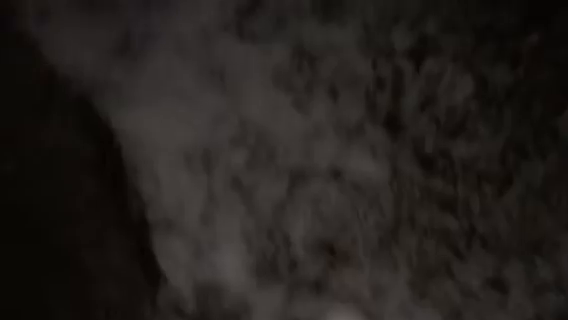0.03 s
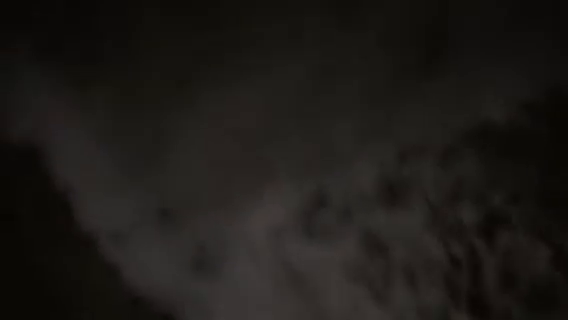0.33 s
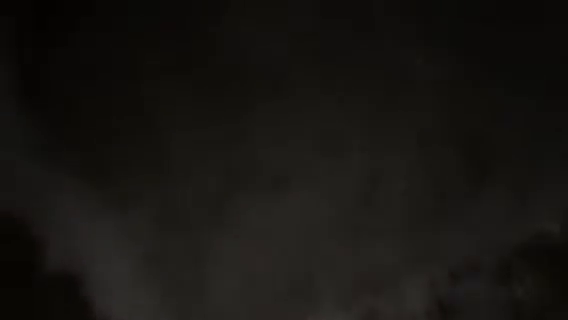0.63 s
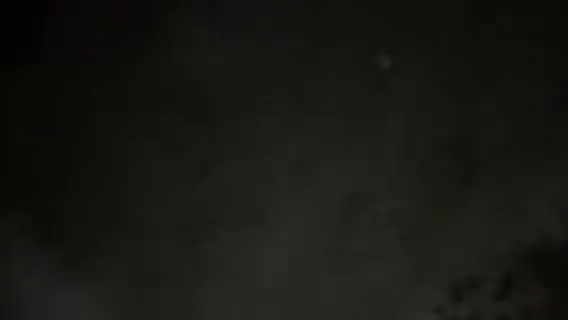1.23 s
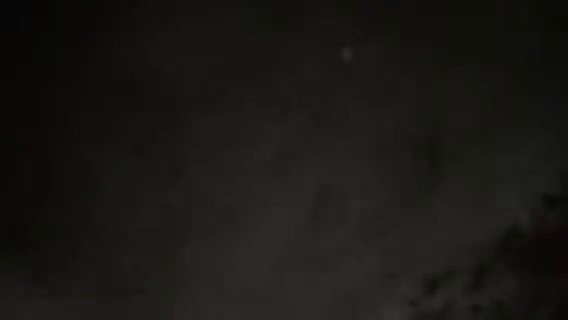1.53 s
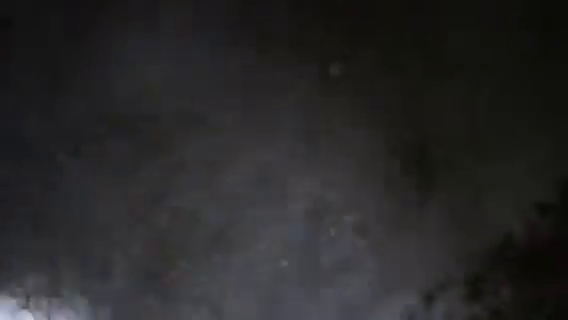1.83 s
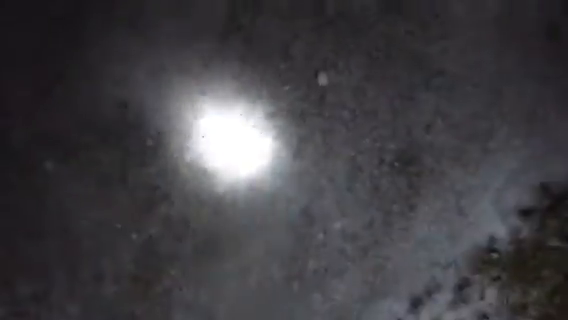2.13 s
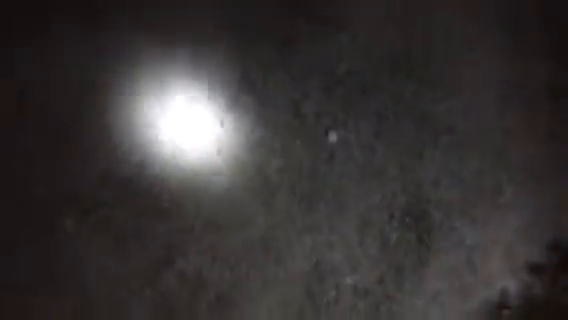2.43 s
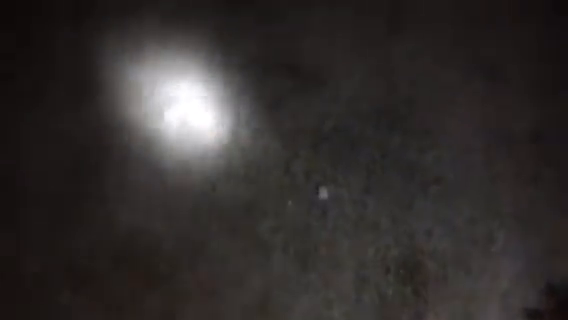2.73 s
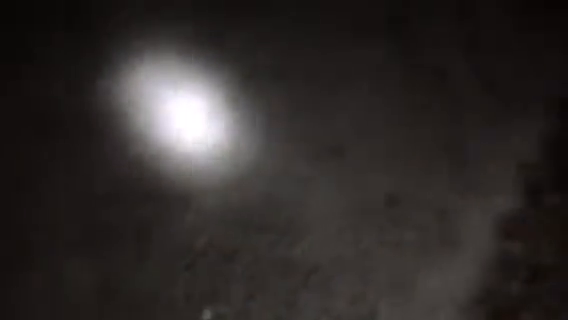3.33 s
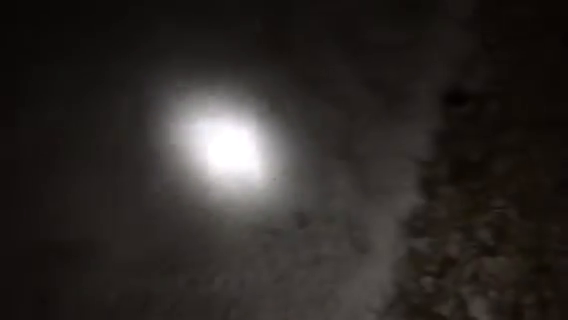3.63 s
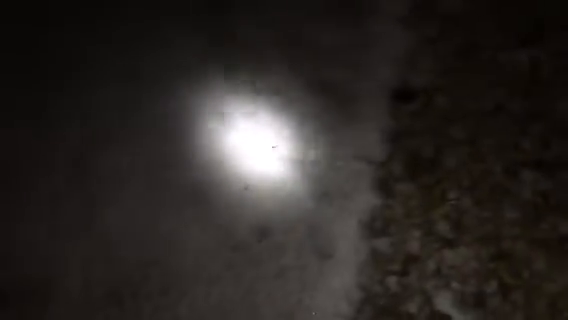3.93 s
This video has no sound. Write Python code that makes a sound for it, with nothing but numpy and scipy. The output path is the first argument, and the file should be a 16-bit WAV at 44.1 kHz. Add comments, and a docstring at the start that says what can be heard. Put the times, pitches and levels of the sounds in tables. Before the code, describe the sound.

Footsteps crunch on frozen slush outdoors at night: three slow, gritty steps with short hollow snaps of ice. The cracking then thins to isolated clicks, leaving a faint traffic-like hum and low rumble on the microphone.

```python
"""Outdoors at night, on frozen slush: three slow steps crunch, then the walker stops and the crust
keeps snapping under the shifting weight. Each step crushes a mass of small grains and sheds a fine
fizz of crystals; single plates of ice break with short hollow snaps. Behind are a distant hum like
traffic and a low rumble of air and handling on the microphone."""
import sys
import numpy as np
from scipy import signal
from scipy.fft import rfft, irfft
from scipy.io import wavfile
from scipy.ndimage import uniform_filter1d

SR = 44100
rng = np.random.default_rng(int(sys.argv[2]) if len(sys.argv) > 2 else 0)


def to_wav(s):
    """Save 16-bit WAV."""
    ch = np.atleast_2d(s).T  # columns
    pcm = np.round(np.clip(ch, -1, 1) * 32767)  # PCM
    wavfile.write(sys.argv[1], SR, pcm.astype(np.int16))


N = 176400

# Crust giving way underfoot. Each row: time in seconds, crush level in dB, fizz level in dB.
CRUST_LEVELS = [(0, -44.5, -44), (0.06, -33.5, -41), (0.125, -29.5, -38.5), (0.18, -37.5, -39),
                (0.21, -65, -41.5), (0.275, -56, -48.5), (0.335, -33, -36), (0.38, -57.5, -48.5),
                (0.48, -53, -50), (0.572, -65, -61), (0.605, -57, -51.5), (0.69, -60, -60.5),
                (0.735, -39.5, -46), (0.772, -29.5, -32), (0.83, -35, -40.5), (0.87, -42.5, -45.5),
                (0.97, -59, -54.5), (1.06, -48.5, -48.5), (1.16, -57, -53.5), (1.235, -59, -58.5),
                (1.28, -39.5, -51.5), (1.317, -42, -33.5), (1.35, -47, -47), (1.43, -51, -52.5),
                (1.55, -68, -54.5), (1.655, -51, -50), (1.73, -56, -62.5), (1.85, -51.5, -61),
                (2.04, -48, -58), (2.21, -56, -72.5), (2.32, -54, -65.5), (2.5, -64.5, -72),
                (2.8, -83, -75)]


def from_db(db):
    """Decibels to gain."""
    return 10 ** (np.asarray(db) / 20)


def rms_one(x):
    """Scale to unit power."""
    return x / np.sqrt(np.mean(x ** 2) + 1e-20)


def in_time(rows):
    """Per-sample curves from rows of time in seconds and values."""
    times_s, *columns = np.transpose(rows)
    return [np.interp(np.arange(N) / SR, times_s, column) for column in columns]


def event_time(size=1500):
    """Time axis of one small event, in seconds."""
    return np.arange(size) / SR


def pulse(t, peak_s):
    """Envelope: rises to 1 at peak_s, then decays."""
    u = np.maximum(t, 0) / peak_s
    return u * np.exp(1 - u)


def add(out, start_s, sound):
    """Mix in a short sound."""
    i = int(np.clip(start_s * SR, 0, N - 1))
    out[i:i + len(sound)] += sound[:N - i]


def colour(x, spectrum):
    """Minimum-phase filter; white noise keeps its power. Each row: frequency in Hz, relative dB."""
    size = 2 * N
    hz, db = np.transpose(spectrum)
    bin_hz = np.arange(N + 1) * SR / size
    gain = rms_one(from_db(np.interp(np.log(bin_hz + 1), np.log(hz), db)))
    cepstrum = irfft(np.log(gain))
    cepstrum[1:N] *= 2
    cepstrum[N + 1:] = 0
    return irfft(rfft(x, size) * np.exp(rfft(cepstrum)))[:N]


def noise(spectrum):
    """Steady coloured noise, unit power."""
    return rms_one(colour(rng.standard_normal(N), spectrum))


def waver(x, depth_db, width_hz, hold_s, size=1024):
    """Neighbouring frequencies swell and sink together at random."""
    spectra = signal.stft(x, nperseg=size)[2]
    field = rng.standard_normal(spectra.shape)
    for _ in range(2):
        field = uniform_filter1d(field, max(1, int(width_hz * size / SR)), axis=0)
        field = uniform_filter1d(field, max(1, int(2 * hold_s * SR / size)), axis=1)
    gain = rms_one(from_db(depth_db * rms_one(field)))
    return signal.istft(spectra * gain, nperseg=size)[1][:N]


def swells(rows, spectrum, size=1500):
    """Levelled noise under bell-shaped swells."""
    t, x = np.arange(N) / SR, noise(spectrum)
    x = x / np.sqrt(uniform_filter1d(x ** 2, size) + 1e-9)
    return x * sum(from_db(db) * np.exp(-.5 * ((t - at_s) / half_s) ** 2) for at_s, half_s, db in rows)


def grains(spectrum, per_s, spread_db, decay_s, size=1300):
    """Tiny random fractures: noise bursts of uneven strength, levelled to unit power."""
    onsets = rng.random(N) < per_s / SR
    power = onsets * from_db(spread_db * np.minimum(rng.exponential(1, N), 5)) ** 2
    envelope = np.sqrt(signal.lfilter([1], [1, -np.exp(-2 / (decay_s * SR))], power + 1e-12))
    bursts = colour(envelope * rng.standard_normal(N), spectrum)
    local_power = uniform_filter1d(uniform_filter1d(bursts ** 2, size), size // 2)
    return bursts / np.sqrt(local_power + 1e-12)


def distant_hum(level_db=-51):
    """Wavering noise, like far traffic."""
    # Each row: frequency in Hz, relative level in dB.
    spectrum = [(100, -6), (420, -25), (600, -11.5), (800, -4.5), (960, 1), (1200, -4.5), (1600, -6),
                (2100, -14.5), (2600, -23.5), (3200, -29), (4800, -41), (16000, -50)]
    return from_db(level_db) * waver(noise(spectrum), depth_db=2.5, width_hz=130, hold_s=.08)


def mic_rumble():
    """Air and handling on the microphone: a low rumble with soft bumps."""
    # Each row: time in seconds, level in dB.
    rumble_levels = [(.6, -49.5), (1.0, -50), (1.4, -44), (2.25, -45), (2.45, -51.5), (2.95, -47.5),
                     (3.12, -52), (4, -47.5)]
    # Each row: centre in seconds, half-length in seconds, level in dB.
    bumps = [(.105, 0.022, -31), (.27, 0.091, -42.5), (.452, 0.016, -36), (1.07, 0.031, -47),
             (1.7, 0.033, -42.5), (1.87, 0.042, -43.5), (2.16, 0.017, -39.5), (2.33, 0.021, -45),
             (3.93, 0.043, -40.5)]
    # Each row: frequency in Hz, relative level in dB.
    rumble_spectrum = [(15, -62), (30, -25), (55, -2), (90, 2), (150, -2.5), (225, -3.5), (310, -15),
                       (420, -27), (1500, -76)]
    bump_spectrum = [(15, -34), (42, -16), (62, 5), (80, 2.5), (110, -4), (200, -29), (1000, -65)]
    rumble = waver(noise(rumble_spectrum), depth_db=2, width_hz=140, hold_s=.04)
    return from_db(in_time(rumble_levels)[0]) * rumble + swells(bumps, bump_spectrum)


def sole():
    """The sole packs the slush with dull thuds and scuffs lightly near the end."""
    # Each row: centre in seconds, half-length in seconds, level in dB.
    thuds = [(.13, 0.1, -44.5), (.775, 0.04, -37.5), (1.078, 0.0041, -41), (1.3, 0.026, -32.5)]
    scuffs = [(3.515, 0.0077, -62), (3.575, 0.023, -61.5)]
    # Each row: frequency in Hz, relative level in dB.
    thud_spectrum = [(50, -40), (140, -3.5), (260, -5.5), (450, -1.5), (700, -14), (1500, -49)]
    scuff_spectrum = [(1000, 5.5), (4000, 5), (7000, 13), (9500, 4), (12000, -6), (16000, -6)]
    return swells(thuds, thud_spectrum) + swells(scuffs, scuff_spectrum)


def tinkles(per_s=105, low_hz=1690, high_hz=10000, above_fizz_db=6, spread_db=4, rise_cycles=0.55):
    """Loosened crystals tick at random pitches; their level follows the fizz."""
    t, out = event_time(), np.zeros(N)
    fizz_db = in_time(CRUST_LEVELS)[1]
    candidates = 2000
    for when, chance, pitch, strength in rng.random((candidates, 4)):
        if chance < per_s * N / SR / candidates:
            hz = low_hz * (high_hz / low_hz) ** pitch
            db = fizz_db[int(when * N)] + above_fizz_db + spread_db * min(-np.log(strength), 3.5)
            tick = pulse(t, rise_cycles / hz) * np.sin(2 * np.pi * hz * t)
            add(out, when * N / SR, from_db(db) * tick)
    return out


def chips(roughness=1.34):
    """Small pieces split off with a rough, briefly ringing click."""
    # Each row: start in seconds, pitch in Hz, ring time in seconds, level in dB.
    clicks = [(.0372, 5730, 0.00062, -24.5), (1.7816, 5240, 0.00044, -32), (1.8978, 14100, 0.00016, -39),
              (2.0395, 13200, 0.00014, -35), (2.085, 3350, 0.0014, -46), (2.117, 3420, 0.0016, -49.5),
              (2.331, 6300, 0.0012, -49), (2.499, 3420, 0.0002, -45)]
    t, out = event_time(), np.zeros(N)
    for start_s, hz, ring_s, db in clicks:
        jitter = signal.lfilter([1], [1, -np.exp(-4 / (ring_s * SR))], rng.standard_normal(len(t)))
        envelope = pulse(t, ring_s) * (1 + roughness * rms_one(jitter))
        add(out, start_s, from_db(db) * envelope * np.sin(2 * np.pi * hz * t))
    return out


def crunch(crush_trim_db=0.5, fizz_trim_db=4):
    """Coarse grains crush under the sole; fine crystals fizz around it."""
    # Each row: frequency in Hz, relative level in dB.
    crush_spectrum = [(100, -13), (270, -11), (450, -10.5), (700, -3.5), (1050, 2), (1400, -5), (1900, -13),
                      (2400, -14.5), (3800, -17), (5500, -28.5), (16000, -27)]
    fizz_spectrum = [(300, -20.5), (1500, 0.5), (3000, -3.5), (4200, -2), (6000, -2), (9000, -3),
                     (12000, -7), (16000, -8.5)]
    crush_db, fizz_db = in_time(CRUST_LEVELS)
    crush = grains(crush_spectrum, per_s=1500, spread_db=3, decay_s=0.00047)
    crush *= from_db(crush_db + crush_trim_db)
    fizz = grains(fizz_spectrum, per_s=3000, spread_db=1, decay_s=0.00029)
    fizz *= from_db(fizz_db + fizz_trim_db)
    return crush + waver(fizz, depth_db=3, width_hz=900, hold_s=.009, size=256)


def plate_knock(t, hz, rise_cycles=0.76, sharpness=2.95, sag=0.19):
    """Knock of 2-3 cycles. Highs run faster through a plate, so pitch falls as t ** -sag."""
    cycles = rise_cycles * (hz * t / rise_cycles) ** (1 - sag) / (1 - sag)
    return pulse(t, rise_cycles / hz) ** sharpness * np.sin(2 * np.pi * (cycles + rng.random()))


def plate_snaps():
    """Ice plates splinter, crack, then knock; the knock scatters off shoe and ground."""
    # Each row: start in seconds, knock level in dB, knock pitch in Hz, crack and splinter levels in dB.
    breaks = [(0.0042, -17, 1420, -41, -31.5), (0.024, -24, 950, -56, -41), (0.0377, -25.5, 690, -56, -31),
              (0.0764, -14.5, 920, -26, -47), (0.0839, -14.5, 1070, -29.5, -47),
              (0.1099, -20, 1210, -26, -29), (0.1299, -8.5, 1160, -26, -29), (0.151, -12, 1520, -62, -41),
              (0.159, -14, 1020, -51, -52), (0.177, -6.5, 1310, -24.5, -26),
              (0.1921, -12.5, 1150, -31, -44), (0.238, -25, 2260, -49, -42), (0.25, -21, 1120, -45, -36),
              (0.2975, -22, 1450, -40.5, -39), (0.3564, -21, 1230, -52, -55), (0.3899, -24, 1200, -46, -39),
              (0.3967, -22, 1360, -38.5, -57.5), (0.4744, -29, 1720, -61, -38.5),
              (0.5147, -26.5, 1390, -64, -39.5), (0.6292, -21, 1356, -38.5, -38.5),
              (0.705, -26.5, 1610, -40.5, -37.5), (0.7132, -32, 1090, -33.5, -42),
              (0.7203, -19.5, 1060, -32.5, -38), (0.7242, -43, 1050, -29, -41),
              (0.7488, -15.5, 860, -30, -39), (0.7724, -9, 1040, -29, -30), (0.7786, -13, 920, -44, -35),
              (0.795, -18, 1060, -38, -41), (0.817, -9.5, 960, -29.5, -34), (0.8238, -12.5, 1090, -39, -49),
              (0.837, -14.5, 1210, -38, -32), (0.8743, -20.5, 1190, -44, -50),
              (0.8869, -26, 1580, -37, -31), (0.9128, -20.5, 1510, -35.5, -32),
              (1.022, -29, 1240, -42.5, -40), (1.039, -22.5, 1360, -55, -42),
              (1.075, -26.5, 1040, -35, -33.5), (1.1123, -21.5, 1230, -39.5, -44),
              (1.168, -32, 1660, -40, -40), (1.1938, -30, 1380, -56, -39), (1.246, -24, 1750, -40, -60),
              (1.2517, -21, 1340, -30, -47), (1.2575, -19, 1850, -29, -34), (1.2684, -16, 714, -23.5, -27),
              (1.2762, -20.5, 704, -30.5, -57), (1.2999, -16.5, 770, -33.5, -49),
              (1.3079, -12.5, 850, -28.5, -39), (1.331, -18, 806, -34, -37),
              (1.3629, -17.5, 1020, -36, -29), (1.3842, -17, 800, -37.5, -36),
              (1.3915, -18, 1110, -36.5, -39), (1.4955, -36, 1390, -38, -36),
              (1.4999, -19.5, 1190, -49, -47), (1.5192, -47, 1560, -41, -55),
              (1.5648, -44, 1520, -37.5, -37.5), (1.57, -26, 1100, -38.5, -39),
              (1.6155, -21.5, 880, -42, -46), (1.6349, -17, 980, -39, -41), (1.6386, -13, 1000, -48, -38),
              (1.64, -16, 1070, -36, -40), (1.666, -22.5, 1290, -50, -37), (1.6723, -15.5, 885, -37, -41),
              (1.686, -19, 1110, -39.5, -44), (1.8103, -19, 1070, -38, -36),
              (1.8198, -21.5, 1150, -40.5, -56), (1.825, -22, 1110, -41, -37), (1.897, -44, 1240, -52, -45),
              (1.9514, -18.5, 1030, -41.5, -45), (2.0652, -33, 1520, -40.5, -49),
              (2.1078, -22, 1070, -48, -61), (2.115, -25, 1030, -55, -68), (2.2854, -15, 1610, -45, -47),
              (2.4041, -20.5, 1340, -40, -52), (2.423, -30, 1060, -44.5, -73),
              (2.6176, -34.5, 1900, -58, -74), (2.7736, -37.5, 1530, -55, -66),
              (3.523, -34, 1630, -59, -50.5)]
    # Each row: frequency in Hz, relative level in dB.
    crack_spectrum = [(150, -42.5), (500, 4), (1500, -3), (2400, 3.5), (4200, 2.5), (6300, -10),
                      (8000, -8.5), (16000, -37)]
    splinter_spectrum = [(1000, -38), (4500, -4), (6500, 4), (9000, 2), (16000, -9)]
    knock_trim_db, crack_trim_db, splinter_trim_db = -0.02, 3, -0.5
    crack_lead_s, splinter_lead_s = 0.0004, 0.00098
    scatter_db, chain_from_db, chain_db_per_db = -8.5, -48, 0.25
    t = event_time()
    crack_envelope = pulse(t, peak_s=0.00064) ** 0.48  # bites at once, lingers
    splinter_envelope = pulse(t, peak_s=0.001)
    crush_db = in_time(CRUST_LEVELS)[0]
    knocks, cracks, splinters = np.zeros((3, N))
    for start_s, knock_db, hz, crack_db, splinter_db in breaks:
        knock = from_db(knock_db + knock_trim_db) * plate_knock(t, hz)
        add(knocks, start_s, knock)
        crack = crack_envelope * rng.standard_normal(len(t))
        add(cracks, start_s - crack_lead_s, from_db(crack_db + crack_trim_db) * crack)
        splinter = splinter_envelope * rng.standard_normal(len(t))
        add(splinters, start_s - splinter_lead_s, from_db(splinter_db + splinter_trim_db) * splinter)
        echoes = pulse(t, peak_s=0.0023) * rng.standard_normal(len(t))
        scatter = signal.fftconvolve(knock, echoes / np.linalg.norm(echoes))
        # Under heavy crush a break sets off its neighbours: more scatter.
        chain_db = chain_db_per_db * max(crush_db[int(start_s * SR)] - chain_from_db, 0)
        add(knocks, start_s, from_db(scatter_db + chain_db) * scatter)
    bright = colour(cracks, crack_spectrum) + colour(splinters, splinter_spectrum)
    bright = waver(bright, depth_db=0.5, width_hz=1500, hold_s=.012, size=128)
    bass_cut = signal.butter(2, 219, "high", fs=SR, output="sos")  # the knocks carry no low end
    return signal.sosfilt(bass_cut, knocks) + bright


def scene():
    """Feet on ice over the night background, mono."""
    steps = plate_snaps() + chips() + tinkles() + crunch() + sole()
    return (steps + distant_hum() + mic_rumble())[None]


def record(dry):
    """The microphone port cuts three treble dips; peaks are rounded, then the top is cut."""
    # Each row: centre in Hz, width in Hz, gain in dB.
    port_dips = [(4900, 270, -5.5), (7430, 1600, -4), (10400, 1700, -6)]
    peak_limit, cutoff_hz = 0.28, 15800
    for hz, width_hz, db in port_dips:
        band = signal.lfilter(*signal.iirpeak(hz, hz / width_hz, fs=SR), dry)
        dry = dry + (from_db(db) - 1) * band
    dry = peak_limit * np.tanh(dry / peak_limit)
    return signal.sosfilt(signal.ellip(12, .1, 80, cutoff_hz, fs=SR, output="sos"), dry)


dry = scene()
out = record(dry)
to_wav(out)
```